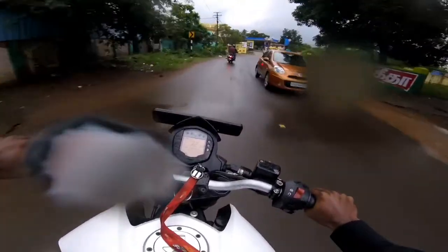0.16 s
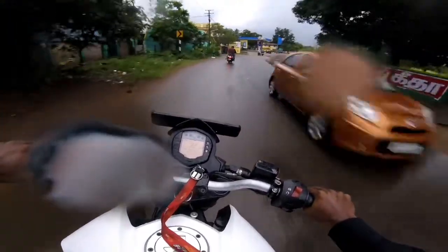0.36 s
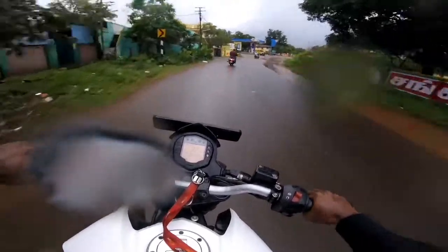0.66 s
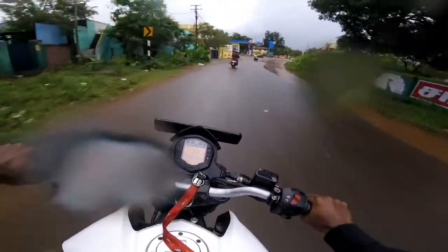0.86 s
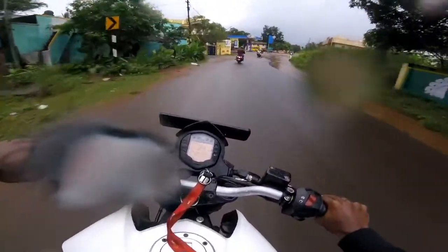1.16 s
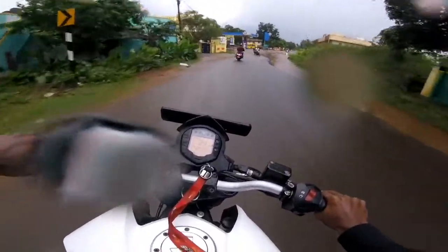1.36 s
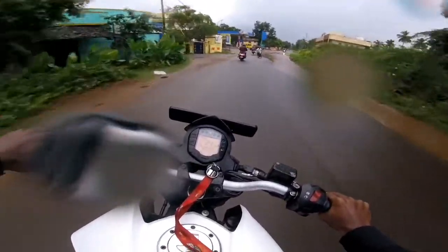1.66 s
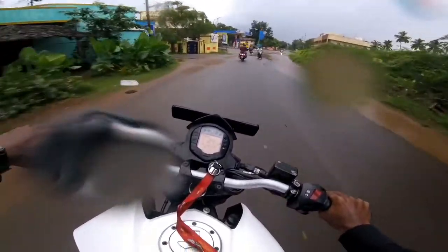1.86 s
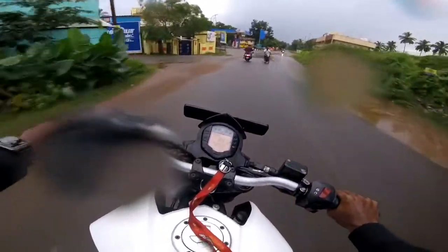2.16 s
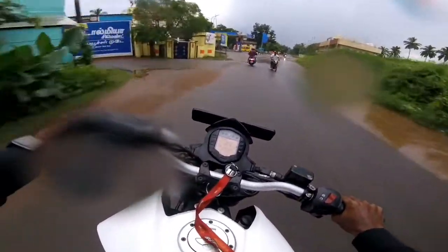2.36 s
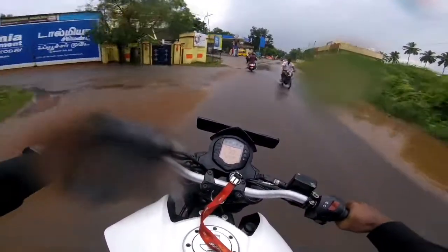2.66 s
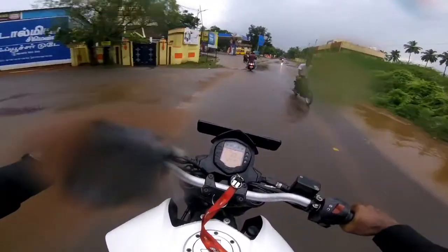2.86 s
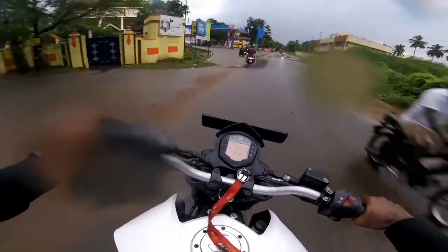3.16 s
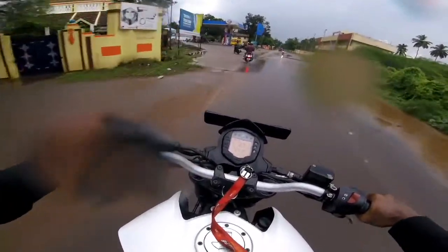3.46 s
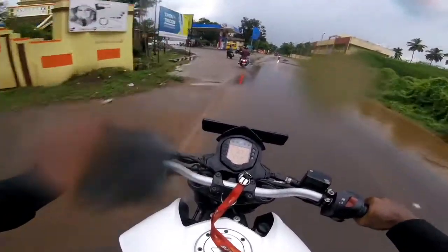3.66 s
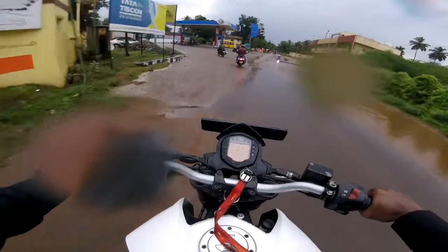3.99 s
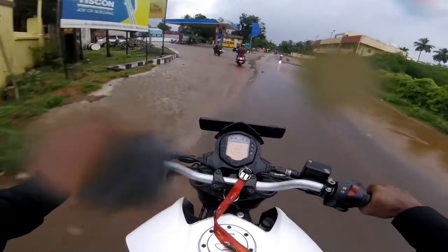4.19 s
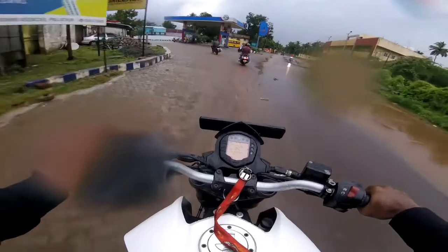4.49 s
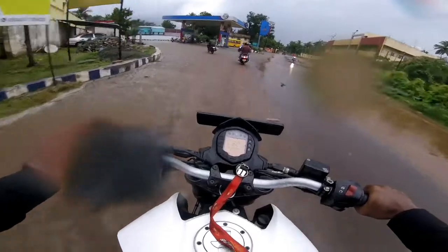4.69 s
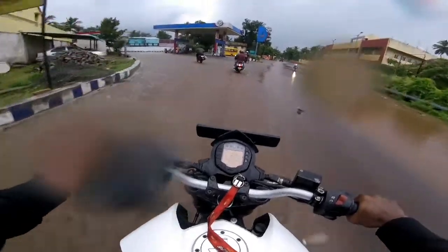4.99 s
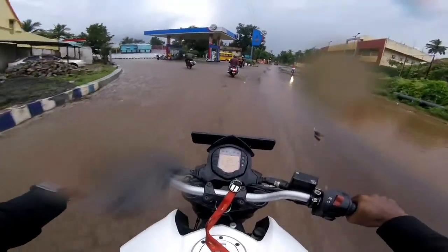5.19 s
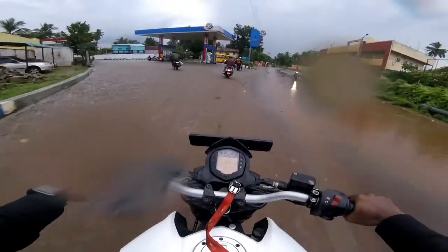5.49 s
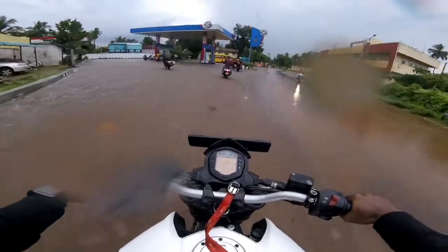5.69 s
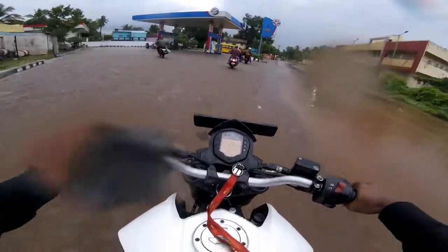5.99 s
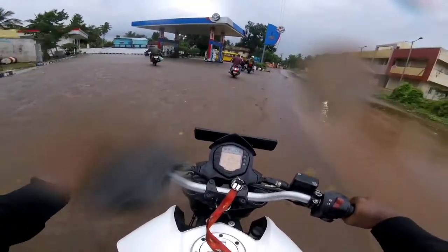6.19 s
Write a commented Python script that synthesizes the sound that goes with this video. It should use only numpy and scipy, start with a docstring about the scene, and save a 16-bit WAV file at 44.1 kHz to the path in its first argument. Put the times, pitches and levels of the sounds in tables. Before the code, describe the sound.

Heavy wind lumps and sharp pressure slaps over a motorcycle's throbbing engine and wet-road rush, thinning into hollow hum and small ticks.

```python
"""Low lumps of wind buffet the microphone first, over the rush of a single-cylinder motorcycle on a wet road.
The microphone rides in a closed case on the rider: coloured noise makes spray and air, resonances make its hum.
Wind is low noise shaped by gusts, with single pressure slaps; drops and grit ring the case.
Exhaust partials stand out while the throttle is open, with crank thrum and valve knocks; a faint whine follows.
The rush and the engine drop suddenly a few times and creep back."""
import sys
import numpy as np
from scipy import signal
from scipy.io import wavfile
from scipy.ndimage import uniform_filter1d

SR = 44100
rng = np.random.default_rng(int(sys.argv[2]) if len(sys.argv) > 2 else 0)


def generate_wav(sig):
    """Save sig (samples, or channels by samples) to the path in sys.argv[1] as 16-bit PCM at SR."""
    pcm = np.round(np.clip(np.atleast_2d(sig).T, -1, 1) * 32767).astype(np.int16)
    wavfile.write(sys.argv[1], SR, pcm)


N = 279594
T = np.arange(N) / SR


def gain_of(db):
    """Decibels to gain."""
    return 10 ** (np.asarray(db) / 20)


def evened(x):
    """Scales to rms 1."""
    return x / np.sqrt(np.mean(x ** 2) + 1e-20)


def columns(rows):
    """Every column of a curve table, interpolated to sample rate."""
    s, *values = np.transpose(rows)
    return [np.interp(T, np.maximum.accumulate(s), v) for v in values]


def lumps(rate_hz, depth_db):
    """A random gain that wobbles up to a rate, rms 1."""
    lowpass = signal.butter(2, rate_hz, fs=SR, output="sos")
    slow = signal.sosfilt(lowpass, rng.standard_normal(N + SR))[SR:]  # the first second settles the filter
    return evened(gain_of(depth_db * evened(slow)))


def noise(points, rings=(), patchy_db=0., wander=0., size=512):
    """Random short-time spectra of a given colour, with wandering, fading peaks and drifting patches."""
    hop, hz = size // 4, np.fft.rfftfreq(size, 1 / SR)
    real, imaginary, patches = rng.standard_normal((N // hop + 5, len(hz), 3)).T
    patches = uniform_filter1d(patches, size=7, axis=0)
    patches = evened(uniform_filter1d(patches, size=14, axis=1))
    f, db = np.transpose(points)
    colour = gain_of(np.interp(np.log(hz + 1), np.log(f), db, -120, -120))
    sway = rng.standard_normal((real.shape[1], len(rings), 2))
    sway = uniform_filter1d(sway, size=50, axis=0).T * np.sqrt(50)
    peaks = 0  # power added over the colour
    for (centre, width, peak_db), shift, fade in zip(rings, *sway):
        offset = (hz[:, None] - centre - wander * width * shift) / width
        peaks = peaks + gain_of(2 * peak_db + 2.5 * fade) / (1 + (2 * offset) ** 2)
    spectra = (real + 1j * imaginary) * colour[:, None] * np.sqrt(1 + peaks)
    spectra = spectra * gain_of(patchy_db * patches)
    return evened(signal.istft(spectra, nperseg=size, noverlap=size - hop)[1][:N])


def resonate(x, hz, width):
    """One resonance of gain 1, fixed or moving, applied twice for steep skirts."""
    turn = np.exp(2j * np.pi * np.cumsum(hz + 0 * T) / SR)
    r = np.exp(-np.pi * width / SR)
    at_zero = x / turn  # the resonance is shifted down to 0 Hz and back up
    return 2 * (turn * signal.lfilter([(1 - r) ** 2], [1, -2 * r, r * r], at_zero)).real


def ring(drive, modes, drift=1):
    """A drive through parallel resonances of alternating sign, rms 1."""
    total = np.zeros(N)
    for k, (hz, width, db) in enumerate(modes):
        total += (-1) ** k * gain_of(db) * evened(resonate(drive, hz * drift, width))
    return evened(total)


# colour of the wind's low swings: (frequency [Hz], relative density [dB per Hz])
BUFFET_COLOUR = [(12, -30), (25, 3), (40, -1), (70, -3.5), (110, -10), (200, -31.5), (400, -32)]
# colour of the faster flutter: (frequency [Hz], relative density [dB per Hz])
FLUTTER_COLOUR = [(60, -20), (120, 6), (170, 1.5), (260, -3.5), (350, -14.5), (600, -21.5), (1500, -39.5),
                  (4000, -57)]
# breeze between the gusts: (time [s], buffet level [dB])
BREEZE = [(0, -31), (.35, -21.5), (.76, -28.5), (1.1, -23.5), (1.39, -27), (1.7, -23.5), (2.25, -21),
          (2.43, -28), (2.82, -35), (3.45, -34), (3.87, -31), (4.14, -31), (4.18, -42), (4.24, -27.5),
          (4.52, -35), (4.76, -35.5), (4.85, -29.5), (5.13, -37.5), (5.55, -31), (6.34, -30.5)]
# gusts: (centre [s], buffet level [dB], half width to 1/e of the power [s], flutter over buffet [dB])
GUSTS = [(.02, -23.5, 0.015, -13), (.23, -21.5, 0.04, -8.5), (.45, -12.5, 0.0095, -3.5),
         (.53, -17, 0.044, -4.5), (0.67, -19, 0.029, -6), (.855, -15, 0.017, -13), (1.15, -22, 0.016, -15),
         (1.24, -20.5, 0.037, -10), (1.46, -21, 0.027, -2), (1.55, -12.5, 0.021, -8),
         (1.86, -19.5, 0.022, -7), (1.93, -25, 0.032, 2.5), (2.12, -20.5, 0.088, -4),
         (2.32, -15.5, 0.018, -1.5), (2.57, -21, 0.037, -10.5), (2.652, -12, 0.016, -10),
         (2.73, -26.5, 0.023, -8), (2.945, -21.5, 0.045, -6), (3.26, -21.5, 0.041, -8.5),
         (3.64, -17, 0.045, -10), (3.79, -25, 0.053, -12), (3.962, -21, 0.056, -12),
         (4.12, -20.5, 0.026, -13.5), (4.43, -20, 0.032, -2), (4.81, -28, 0.0095, -5),
         (4.91, -26, 0.057, -15), (5.08, -27.5, 0.027, -14), (5.192, -25.5, 0.038, -4.5),
         (5.299, -19, 0.02, -13), (5.46, -27.5, 0.082, -9), (5.64, -23, 0.02, -12),
         (5.76, -22.5, 0.038, -22), (5.88, -23.5, 0.071, -11), (6.11, -28, 0.028, -13),
         (6.25, -22.5, 0.047, -14), (6.31, -20.5, 0.055, -11.5)]
BREEZE_FLUTTER_DB = -6.5  # between gusts, over the buffet


def wind():
    """Low pressure swings: breeze and bell-shaped gusts; the faster flutter rides on the same lumps."""
    gusty = lumps(26.0, 2.16)
    low = noise(BUFFET_COLOUR, size=4096) * gusty * lumps(9., 1.4)
    flutter = noise(FLUTTER_COLOUR, size=2048) * gusty * lumps(26.0, 1.23)
    low_power = gain_of(2 * columns(BREEZE)[0])
    flutter_power = low_power * gain_of(2 * BREEZE_FLUTTER_DB)
    for s, db, width, flutter_db in GUSTS:
        bell = gain_of(2 * db) * np.exp(-((T - s) / width) ** 2)
        low_power = low_power + bell
        flutter_power = flutter_power + gain_of(2 * flutter_db) * bell
    return np.sqrt(low_power) * evened(low) + np.sqrt(flutter_power) * evened(flutter)


# single slaps of wind on the microphone: (time [s], peak level [dB], nominal length [s], sign)
SLAPS = [(.445, -11, .006, 1), (.51, -10, .010, 1), (.561, -11, .005, 1), (.664, -6.5, .009, 1),
         (.8405, -6.5, .004, -1), (.8465, -14, .003, 1), (.854, -12, .014, 1), (1.55, -9, .011, -1),
         (2.147, -8, .012, 1), (2.327, -6, .008, 1), (2.657, -8, .013, 1), (2.937, -16, .014, -1),
         (2.951, -15, .008, 1), (3.253, -14, .008, 1), (3.613, -14, .008, 1), (3.623, -13, .018, -1),
         (3.664, -15, .014, 1), (4.009, -14, .008, -1), (4.397, -14, .009, 1), (4.409, -13, .006, 1),
         (4.414, -16, .01, -1), (4.448, -5.5, .003, 1), (4.4535, -5, .009, 1)]


def slaps():
    """Pressure bumps with a rebound either side and a rough tail; also the gain each leaves the buffet."""
    out, calm = np.zeros(N), np.ones(N)
    rough = noise([(200, 9), (400, 7.5), (1000, -10.0), (1800, -22)], size=1024)  # (Hz, dB per Hz)
    for s, db, length, sign in SLAPS:
        u = (T - s) / (0.35 * length)
        bump = sign * (1 - .36 * u ** 2) * np.exp(-u ** 2 / 2.2)
        roughness = min(.004 / length, 1)  # short slaps are the rough ones
        tail = np.clip(u, 0, 1) * np.exp(-abs(T - s) / .013) * roughness
        out += gain_of(db) * (bump + .11 * tail * rough)
        calm *= 1 - .8 * np.exp(-((T - s) / .02) ** 2)
    return out, calm


# drops and grit striking the case:
# (time [s], tick strength [dB], low knock over tick [dB], ping pitch [Hz], ping over tick [dB])
STRIKES = [(0.8852, -35, 12, 5340, -4), (3.3317, -33.5, -13, 6380, -3), (4.2415, -25, 14, 6500, -7),
           (4.666, -36, -4, 2730, -4), (5.2807, -40, 22.5, 2090, -2), (5.444, -37, 13, 1550, 2),
           (5.594, -37, 8, 1720, 4), (5.6812, -32, -14, 4960, -2), (6.263, -34.5, 15, 2180, -3),
           (6.325, -38, 4, 2420, 0.5)]
# modes of the case, the first three its body, the others its shell:
# (frequency [Hz], relative level [dB], decay by 60 dB [s])
CASE_MODES = [(300, 0, .04), (620, -1, .04), (1280, -5, .02), (2300, -10, .005), (3600, -18, .004),
              (5350, 0, .004), (6400, -5, .006)]


def ticks():
    """Listed strikes, each with a short rough ping, and many faint random ones ring the case's modes."""
    high, low, pings = np.zeros((3, N + 2000))
    t = T[:2000]
    rattles = rng.standard_normal((len(STRIKES), len(t)))
    for (s, db, knock_db, hz, ping_db), rattle in zip(STRIKES, rattles):
        start = round(s * SR)
        at = slice(start, start + len(t))
        high[at] += gain_of(db) * (rattle * np.exp(-t / .003) + 6 * (t == 0))
        # the knock swells after the tick
        low[at] += gain_of(db + knock_db) * rattle * t / .004 * np.exp(-t / .005)
        roughness = 1 + evened(uniform_filter1d(rattle, size=60)) / 2
        pings[at] += gain_of(db + ping_db - 60 * t / .04) * roughness * np.sin(2 * np.pi * hz * t)
    faint_db = -33 + 3.5 * np.minimum(rng.exponential(1, N), 3)
    high[:N] += gain_of(faint_db) * (rng.random(N) < 60 / SR)  # about 60 a second
    modes = [gain_of(db - 60 * t / t60) * np.sin(2 * np.pi * hz * t) for hz, db, t60 in CASE_MODES]
    body, shell = (m / np.linalg.norm(m) for m in (sum(modes[:3]), sum(modes[3:])))
    rung = signal.oaconvolve(low, body) + signal.oaconvolve(high, shell)
    struck = rung[:N] / 2 + pings[:N]
    # the case dulls above its top mode
    return signal.sosfilt(signal.butter(4, 8000., fs=SR, output="sos"), struck)


# a faint whine sinks after the throttle shuts: (time [s], pitch [Hz], level [dB])
WHINE = [(2.62, 1534, -62), (2.846, 1276, -57), (2.95, 1200, -66)]


def whine():
    """One sliding sine of wavering level that fades in and out."""
    hz, db = columns(WHINE)
    start, end = WHINE[0][0], WHINE[-1][0]
    fade = np.clip(np.minimum(T - start, end - T) / .04, 0, 1)
    tone = np.sin(2 * np.pi * np.cumsum(hz) / SR)
    return np.sqrt(2) * gain_of(db) * fade * lumps(12., 1.4) * tone


# spray and air, swelling as a car and a bike pass, before the drops:
# (time [s], rush level [dB], treble over rush [dB])
RUSH = [(0, -40.5, -6.5), (.4, -39, -4), (.6, -36.5, -3), (.86, -42.5, -5), (.895, -40, -1.5),
        (.93, -42, -5), (1.05, -41, -2.5), (1.2, -39, -4), (2.2, -39, -3), (2.58, -40, -4),
        (2.75, -42.5, -4), (3.3, -42.5, -1), (3.5, -42, -1.5), (3.7, -43, -2.5), (4.2, -44, -0.5),
        (4.3, -41.5, -1), (4.52, -45.5, -2.5), (4.85, -44, -0.5), (5.4, -44.5, -3), (5.95, -44, -2),
        (6.34, -43.5, -6.5)]
# hollow hum of the case: (time [s], level over rush [dB])
HUM = [(0, 6), (.5, 4), (.6, -2), (.86, 4), (1.2, 3.5), (2.4, 2), (2.7, 6), (3, 3.5), (3.3, 4), (4.1, 4.5),
       (4.27, 9), (4.4, 4), (5.3, 7), (5.45, 3.5), (5.88, 8), (6.34, 5.5)]
# colours of the middle and the treble: (frequency [Hz], relative density [dB per Hz])
MID = [(440, -5), (750, -0.5), (1050, -2.5), (1290, -1.5), (1350, -7), (1430, -3), (1900, -2.5),
       (2300, -6.5), (3450, -15), (4400, -16), (5700, -60)]
TREBLE = [(2470, -4), (4200, -11), (4450, -8.5), (4890, -1.5), (5740, 2), (6090, 0.5), (6510, 0),
          (7150, -6.5), (9310, -14.5), (10100, -27), (10900, -26.5), (12200, -44), (15900, -61)]
# peaks standing over those colours: (frequency [Hz], width [Hz], level over the colour [dB])
MID_RINGS = [(1650, 300, 1.5), (2075, 55, 7.5), (2580, 110, 2)]
TREBLE_RINGS = [(6430, 170, -1)]
# resonances of the hollow hum: (frequency [Hz], width [Hz], relative level [dB])
HOLLOW = [(321.5, 58, -0.5), (454.4, 68, 0), (596.2, 70, 3.5), (660, 103, -3)]


def rush(beat):
    """Spray and air in three ranges of the case; the firing beat throbs in the lower two."""
    rush_db, treble_db = columns(RUSH)
    shared = lumps(22.0, 0.85)
    mid = evened(noise(MID, MID_RINGS, patchy_db=1.0, wander=.2, size=1024) * beat)
    treble = noise(TREBLE, TREBLE_RINGS, patchy_db=1.0)
    drive = rng.standard_normal(N) * lumps(9.6, 1.64) * beat
    hollow = ring(drive, HOLLOW, drift=lumps(5., 0.22))  # its pitch wavers by a few percent
    mix = mid + gain_of(treble_db) * treble + gain_of(columns(HUM)[0]) * hollow
    return gain_of(rush_db) * shared * mix


# sudden drops of the rush and engine: (time of the full drop [s], depth [dB], time constant of return [s])
DROPS = [(.602, 3, 0.45), (2.238, 7.5, 0.35), (2.591, 6.5, 0.72), (3.51, 2, 1)]
DROP_S = .005  # length of each fall


def ducking():
    """A gain that falls within milliseconds at each drop and creeps back exponentially."""
    depth_db = 0
    for s, db, back in DROPS:
        fall = np.clip((T - s) / DROP_S + 1, 0, 1)
        depth_db = depth_db + db * fall * np.exp(-np.maximum(T - s, 0) / max(back, .01))
    return gain_of(-depth_db)


# engine speed, a lower gear is taken near 1 s: (time [s], firings per second [Hz])
SPEED = [(0, 32.2), (.95, 31.8), (1.12, 40.2), (1.5, 41.7), (1.8, 42.9), (2, 43.8), (2.2, 44.7),
         (2.4, 45.8), (2.6, 46.2), (3, 46), (6.34, 43)]


def firing_cycle():
    """Firing rate in Hz and its running count of firings."""
    hz = columns(SPEED)[0]
    return hz, np.cumsum(hz) / SR


# firing beat heard in the rush: (time [s], depth [0-1])
BEAT = [(0, 0.36), (.9, 0.18), (1.2, 0.14), (2.1, 0.34), (2.58, 0.1), (2.65, 0.22)]


def firing_beat(cycle):
    """A gain that jumps at each firing and decays until the next."""
    pulse = evened(np.exp(-(cycle % 1) / .5))
    return 1 + columns(BEAT)[0] * (pulse - .7)


# resonances of the exhaust pipe: (frequency [Hz], relative level [dB])
PIPE = [(220, -6), (310, -4), (400, -12), (470, -6), (515, -10), (553, -1), (585, -8), (620, -6),
        (720, -14), (870, -17), (965, -16), (1300, -21)]
MESH, MESH_DB = 11, 6.5  # meshing teeth lift every eleventh multiple of the firing rate by this much


def exhaust_note(hz, cycle):
    """Rough multiples of the firing rate slide through the fixed resonances of the pipe."""
    pipe_hz, pipe_db = np.transpose(PIPE)
    uneven = cycle + .002 * np.log(lumps(25, 8.7))  # firings come a little early or late
    note = np.zeros(N)
    for k in range(5, 31):
        level = gain_of(np.interp(k * hz, pipe_hz, pipe_db) + MESH_DB * (k % MESH == 0))
        note += level * lumps(6, 1.8) * np.cos(2 * np.pi * (k * uneven + rng.random()))
    return note


# resonances of the castings: (frequency [Hz], width [Hz], relative level [dB])
CASTINGS = [(950, 150, -1.5), (1150, 420, -5), (1530, 170, -3), (2180, 300, -7), (3530, 210, -8),
            (5020, 220, -3), (5260, 140, 0), (5600, 300, -5), (6530, 250, -3), (7400, 300, -13)]


def valve_clatter(cycle):
    """Four unequal bursts of noise a firing cycle ring the engine castings."""
    quarter = 4 * cycle
    strength = np.array([1, .4, .7, .35])[quarter.astype(int) % 4]
    knocks = (.15 + strength * np.exp(-(quarter % 1) / .4)) * rng.standard_normal(N)
    return ring(knocks, CASTINGS)


# throttle opens near 1 s, shuts at 2.6 s; before the drops:
# (time [s], gain on the exhaust note [dB], valve clatter level [dB])
ENGINE = [(0, -60, -47), (.6, -45.5, -44.5), (.9, -58, -50), (1.05, -50.5, -59), (1.2, -38, -41),
          (1.8, -39.5, -40), (2.23, -37, -40), (2.4, -36.5, -47), (2.5, -34.5, -42), (2.585, -39.5, -46),
          (2.6, -54, -48)]
# crank thrum before the drops: (time [s], level [dB])
THRUM = [(0, -38), (.6, -32), (.75, -22.5), (.9, -24), (1.2, -52), (1.8, -32.5), (2.4, -37), (2.55, -50),
         (3.5, -57)]


def engine(hz, cycle):
    """Exhaust note, valve clatter and the crank's thrum, a sine at two crank turns a firing."""
    note_db, clatter_db = columns(ENGINE)
    thrum = gain_of(columns(THRUM)[0]) * np.cos(4 * np.pi * cycle)
    tones = gain_of(note_db) * exhaust_note(hz, cycle) + thrum
    return np.sqrt(2) * tones + gain_of(clatter_db) * valve_clatter(cycle)


def scene():
    """All sources at the one microphone in the case; slaps displace the wind's buffet."""
    hz, cycle = firing_cycle()
    bumps, calm = slaps()
    ride = (rush(firing_beat(cycle)) + engine(hz, cycle)) * ducking()
    return (wind() * calm + bumps + ticks() + whine() + ride)[None]


def record(dry):
    """Rumble cut, a preamp that rounds the tallest peaks, then the band limit."""
    cut = signal.sosfilt(signal.butter(1, 14., "high", fs=SR, output="sos"), dry)
    rounded = cut / (1 + (cut / .8) ** 4) ** .25
    band = signal.firwin(511, 12387, window=("kaiser", 9), fs=SR)  # lowpass edge in Hz
    return signal.oaconvolve(rounded, band[None], "same")


dry = scene()
out = record(dry)
generate_wav(out)
```